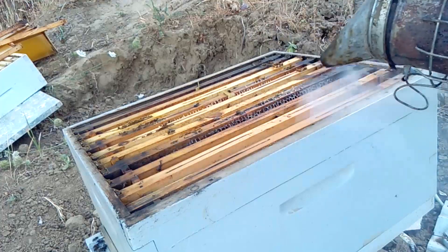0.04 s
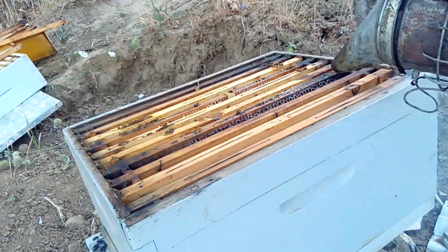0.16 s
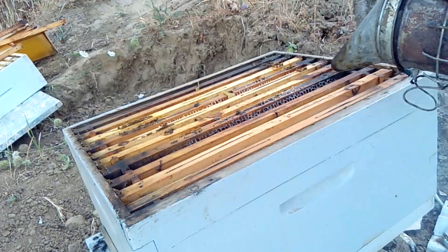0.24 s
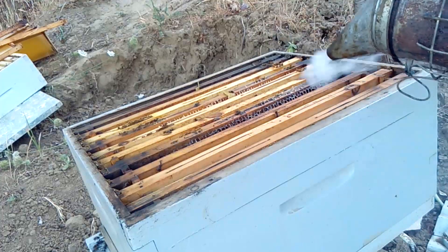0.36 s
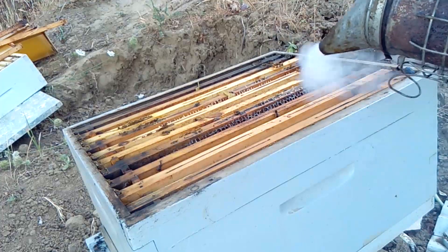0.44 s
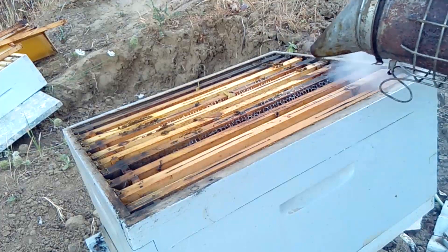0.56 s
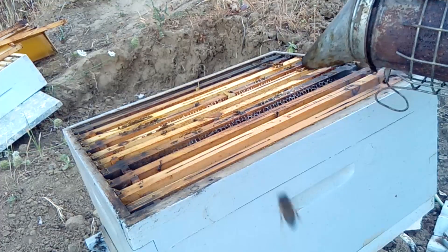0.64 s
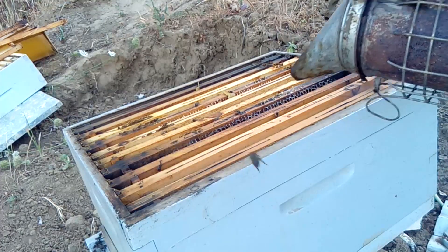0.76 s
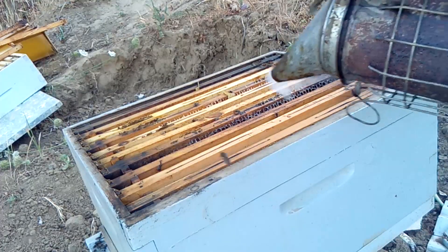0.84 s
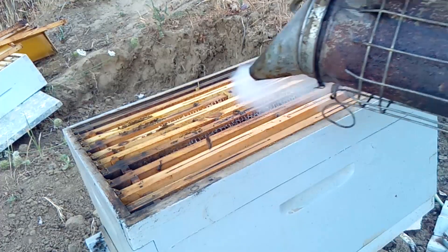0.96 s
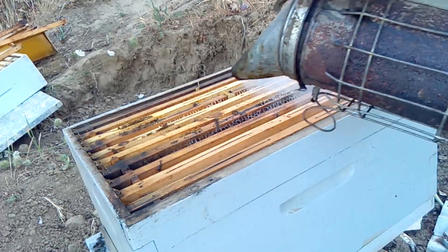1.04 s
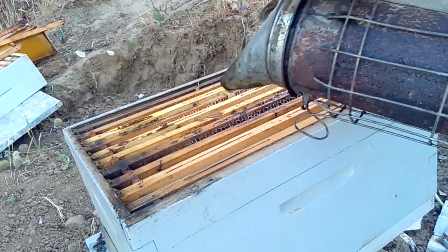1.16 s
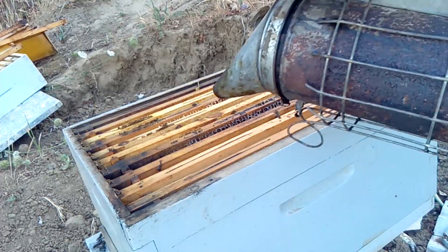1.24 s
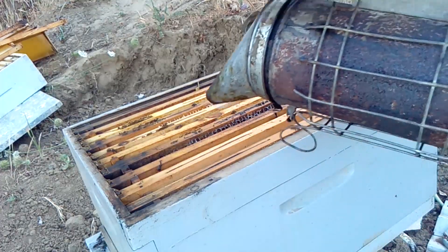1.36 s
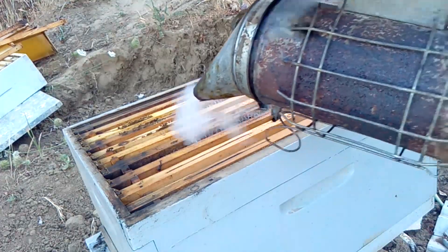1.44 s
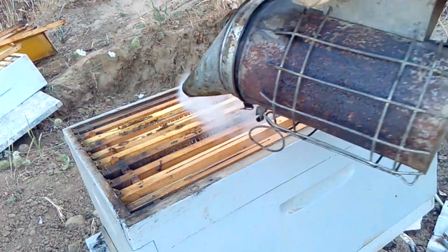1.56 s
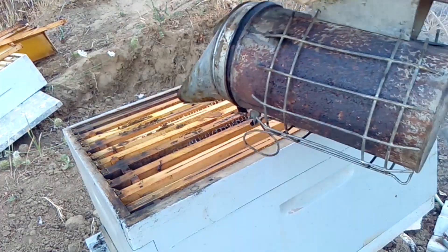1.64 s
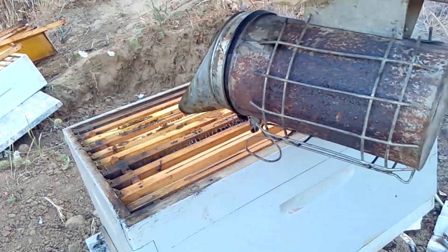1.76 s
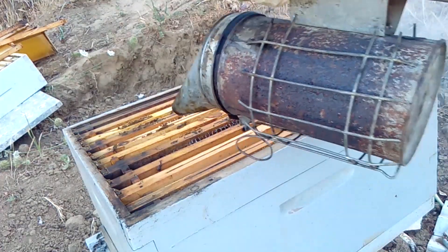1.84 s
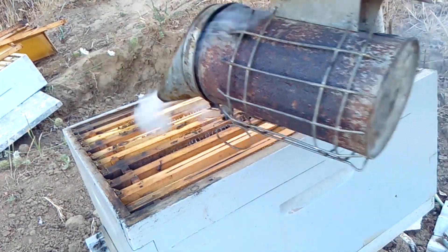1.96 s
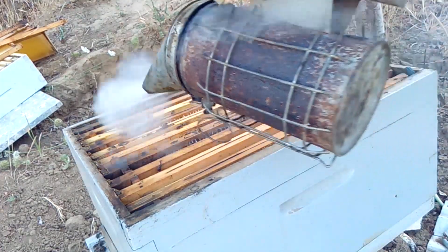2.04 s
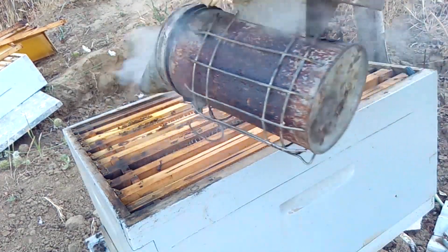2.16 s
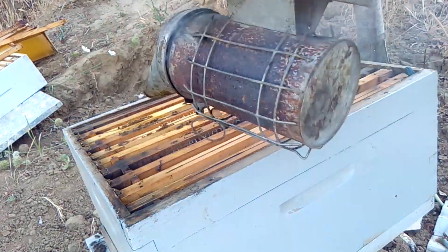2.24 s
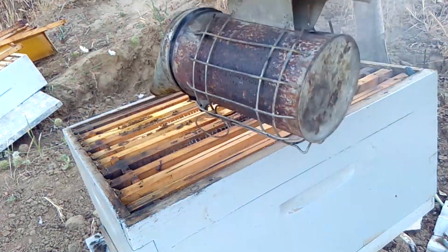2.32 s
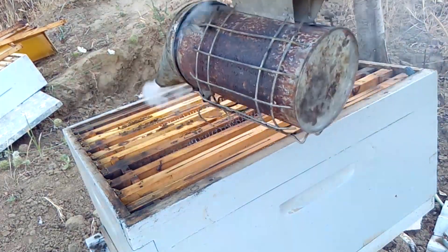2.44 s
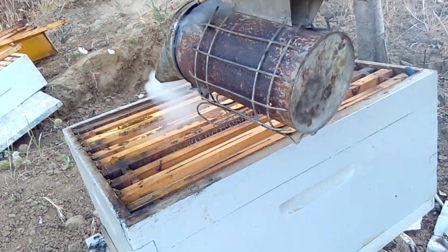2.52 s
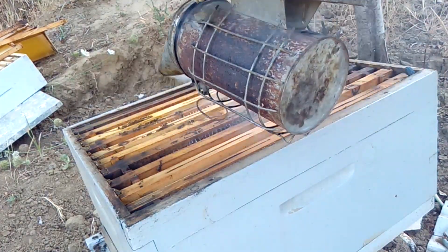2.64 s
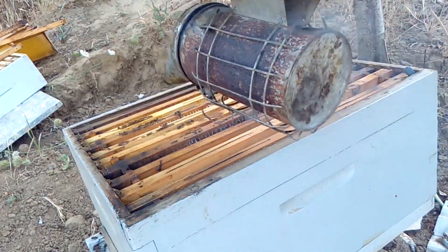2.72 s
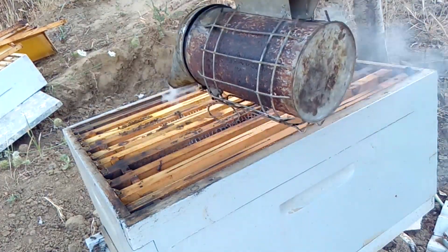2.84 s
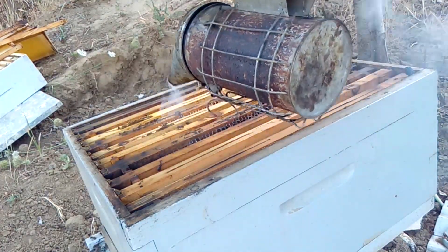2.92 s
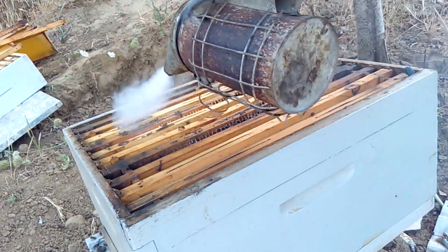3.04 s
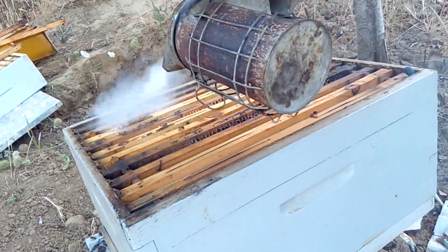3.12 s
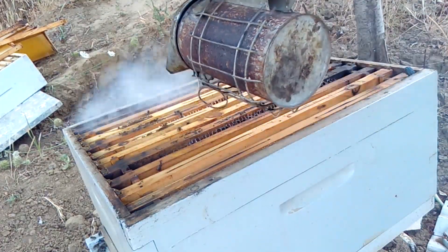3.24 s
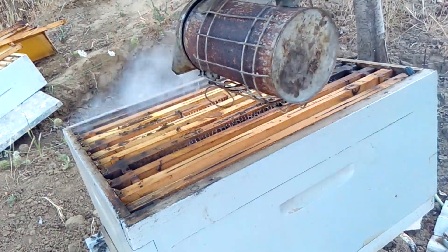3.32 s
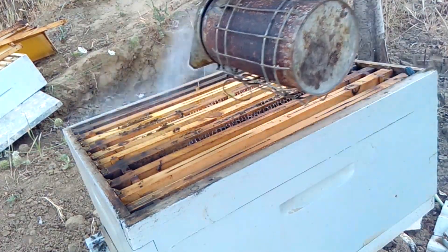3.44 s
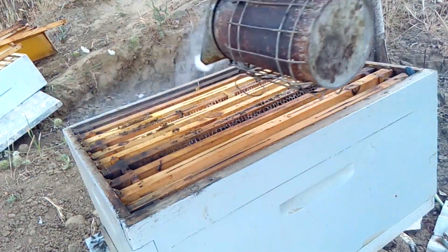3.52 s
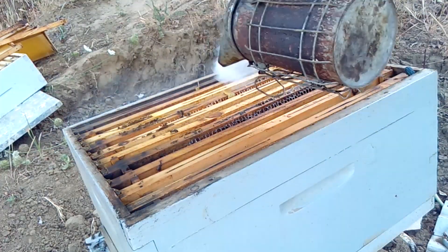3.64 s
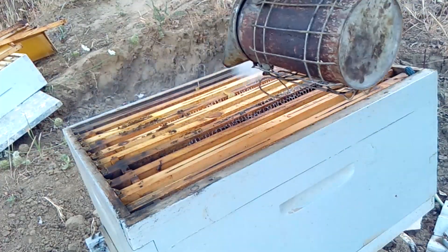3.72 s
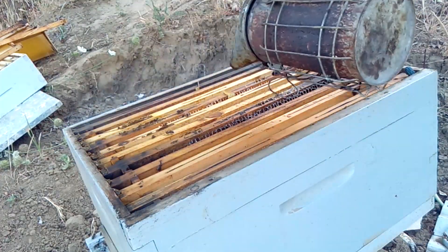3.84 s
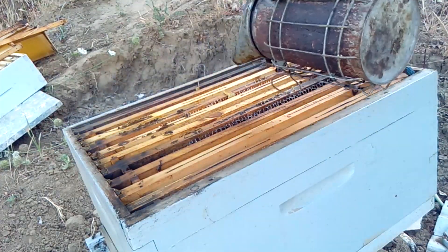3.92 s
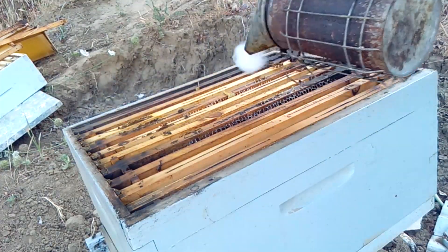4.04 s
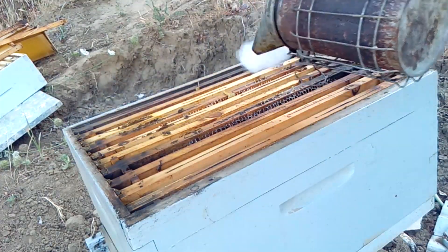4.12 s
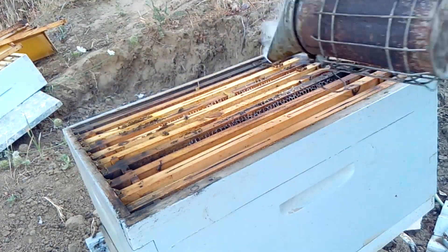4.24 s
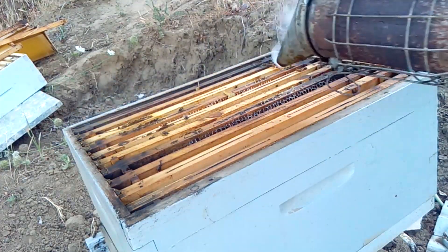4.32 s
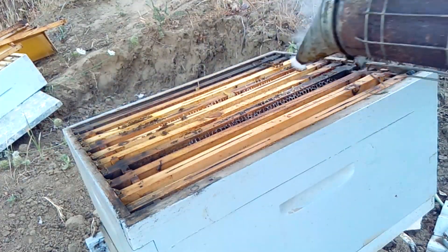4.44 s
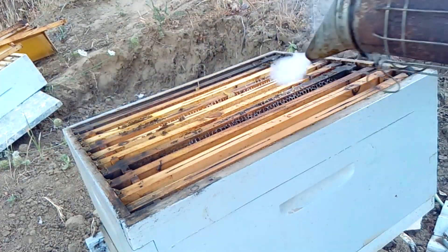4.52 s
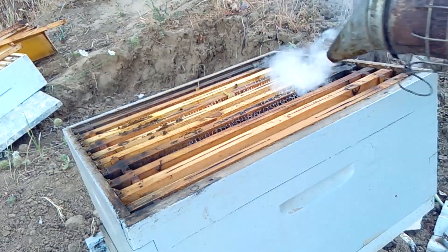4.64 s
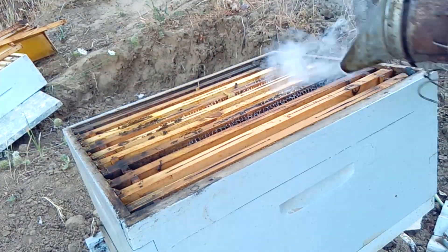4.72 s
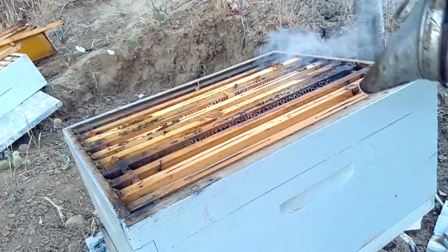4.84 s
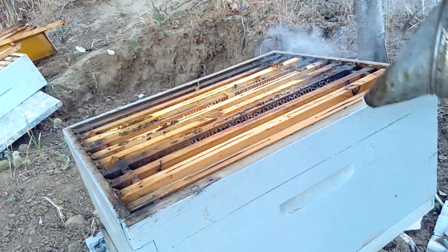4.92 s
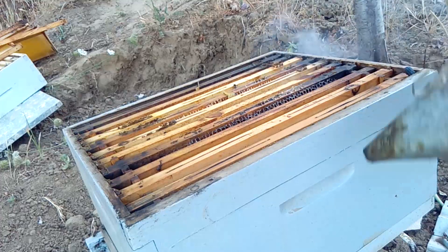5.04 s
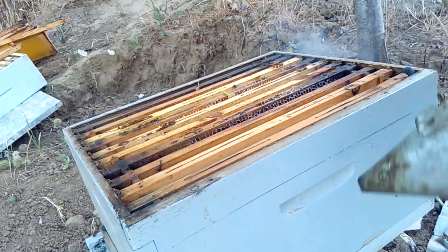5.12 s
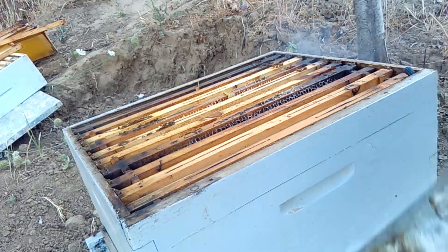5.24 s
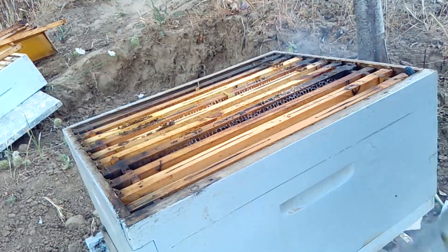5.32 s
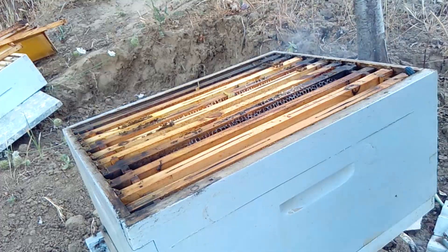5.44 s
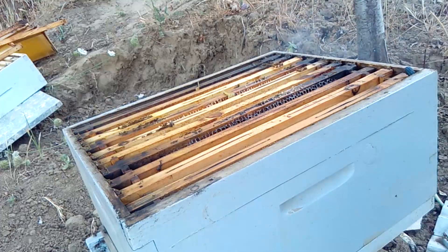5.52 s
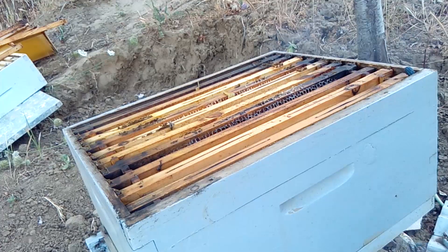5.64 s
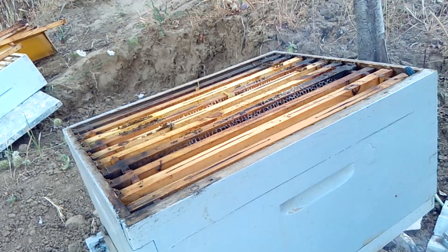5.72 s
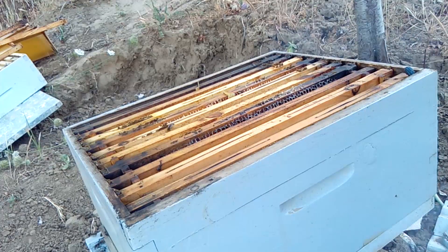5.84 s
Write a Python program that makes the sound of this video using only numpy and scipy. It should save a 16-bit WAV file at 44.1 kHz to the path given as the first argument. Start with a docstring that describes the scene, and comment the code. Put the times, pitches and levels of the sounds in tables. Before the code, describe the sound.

A hand squeezes a bee smoker beside an open hive: a dull bump, a rounded rush of air with soft hiss, a quick blurting flap as the bellows reopen, repeated nine times at an even pace. It stops with one bright tinny tick and grainy handling rubs. Faint bees pass and a far bird chirps downward. Close microphone, mono, very little echo.

```python
"""A bee smoker is pumped nine times over an open hive, outdoors, in quiet air with a few faint bees.
Each squeeze bumps the boards and drives a jet of air through the tin can and its nozzle: shaped noise.
Then the bellows suck air in, a crease pops, and the stiff skin flaps taut: a fluttering tone and tin rattle.
A far bird whistles falling notes late in the pumping and again at the end.
Last, wire clicks on the ringing tin, the smoker is carried off with a rustle, and bees fly by."""
import sys
import numpy as np
from scipy import signal
from scipy.fft import rfft, irfft, next_fast_len
from scipy.io import wavfile
from scipy.ndimage import map_coordinates

SR = 44100
rng = np.random.default_rng(int(sys.argv[2]) if len(sys.argv) > 2 else 0)


def to_wav(s):
    """Save 16-bit WAV."""
    ch = np.atleast_2d(s).T  # columns
    pcm = np.round(np.clip(ch, -1, 1) * 32767)  # PCM
    wavfile.write(sys.argv[1], SR, pcm.astype(np.int16))


N = 258861

# squeezes of the bellows: (full flow [s], rise [s], jet [dB], hollow tone re jet [dB], hiss re jet [dB])
SQUEEZES = [(.159, 0.068, -27, -4.5, -8), (.698, 0.074, -27, -6.5, -7.5), (1.214, 0.074, -25, -7, -9),
            (1.761, .081, -27.5, -5.5, -6.5), (2.267, 0.067, -28.5, -5.5, -6.5),
            (2.817, .086, -30, -4.5, -6.5), (3.354, 0.094, -32, -4.5, -9),
            (3.84, 0.086, -28.5, -6.5, -10.5), (4.31, 0.082, -29, -1.5, -9.5)]
# the skin flaps taut: (time [s], level [dB], pitch [Hz], rattle re flap [dB], intake hiss [dB], crease [dB])
FLAPS = [(0.3691, -24.5, 671, -13.5, -51.5, -35), (0.9037, -22, 558, -13.5, -49, -28.5),
         (1.4293, -21.5, 550, -20, -50, -43), (1.959, -23, 577, -15.5, -51.5, -41),
         (2.4753, -23, 598, -22, -54.5, -46), (3.0199, -23.5, 657, -26, -57, -46),
         (3.5398, -24, 655, -22, -59.5, -55), (4.0278, -24, 658, -15.5, -56, -47),
         (4.4957, -23.5, 582, -16, -50, -36.5)]
# colour of the bellows skin: (frequency [Hz], relative density [dB per Hz])
SKIN = [(60, -26), (150, -7), (340, 1), (430, -6.5), (700, 4), (950, -5.5), (1400, -10), (1800, -12.5),
        (2600, -25), (6000, -43), (10000, -58)]
# modes of the tin can: (frequency [Hz], relative level [dB], decay t60 [s])
TIN = [(577, 0.5, 0.036), (1333, -1, 0.035), (1490, 6.5, 0.022), (2160, -5, 0.018), (2480, -3, 0.025),
       (2770, -21, 0.021), (3185, 3, 0.018), (4020, -26, 0.023), (4920, 0.5, 0.017), (5360, 5, 0.027),
       (6030, 0.5, .02), (7260, -2, .018), (8700, -16, .02)]


def amp(db):
    """Decibels to gain."""
    return 10 ** (np.asarray(db) / 20)


def unit(x):
    """Scale to rms 1."""
    return x / np.sqrt(np.mean(x ** 2) + 1e-20)


def clock(n):
    """Seconds for n samples."""
    return np.arange(n) / SR


def value_at(s, rows):
    """Read (time, value) rows at time s, joined by straight lines."""
    return np.interp(s, *np.transpose(rows))


def wobble(rate, n):
    """A smooth random curve, rate knots a second."""
    knots = rng.standard_normal(int(n * rate / SR) + 4)
    return map_coordinates(knots, [clock(n) * rate])


def noise(spectrum, n, response=lambda hz: 1):
    """Noise of rms 1 with a (Hz, dB) spectrum and a further response."""
    hz = np.fft.rfftfreq(n, 1 / SR)
    f, db = np.transpose(spectrum)
    gain = amp(np.interp(np.log(hz + 1), np.log(f), db))
    return unit(irfft(rfft(rng.standard_normal(n)) * gain * response(hz), n))


def fade(t, t60):
    """Decay by 60 dB in t60 seconds, from t = 0 on."""
    return np.exp(-np.log(1000) * np.maximum(t, 0) / t60)


def add(track, s, x):
    """Mix x into the track at time s."""
    i = round(s * SR)
    x, i = x[max(-i, 0):], max(i, 0)
    track[i:i + len(x)] += x[:max(N - i, 0)]


def tin_colour(hz, boost=0.26, width_hz=55):
    """Air passing through the can is lifted at each mode of the tin but the lowest."""
    return 1 + boost * sum(1 / (1 + ((hz - mode) / width_hz) ** 2) for mode, _, _ in TIN[1:])


def scatter(strength, spread_s=.008, count=12):
    """The response of a few weak reflections off frames and boards, new for each pose of the smoker."""
    delays = rng.uniform(0.00198, spread_s, count)
    signs = rng.choice([-1, 1], count)

    def response(hz):
        """Narrow boards reflect the treble best."""
        treble = 2 * hz / (hz + 2500)
        return 1 + strength * treble * (signs @ np.exp(-2j * np.pi * np.outer(delays, hz)))
    return response


def puffs(can_echo=0.15, can_s=.0029, hive_echo=0.15, stray=0.048, flutter_db=1.04, fizz_db=-16):
    """The jet swells and dies with the squeeze: the can booms even at low flow, the hiss needs full flow."""
    # the jet's main roar: (frequency [Hz], relative density [dB per Hz])
    jet_colour = [(60, -27), (140, -23.5), (260, -12), (400, -3), (520, -8.5), (700, 3.5), (870, -1.5),
                  (1030, 2.5), (1350, -7.5), (1850, -14), (2700, -22.5), (3500, -23), (8000, -61)]
    # hiss of the nozzle: (frequency [Hz], relative density [dB per Hz])
    hiss_colour = [(600, -29), (1600, 1), (2750, 4.5), (3600, -7), (4100, -3), (4700, -5), (5800, -4.5),
                   (6900, -4.5), (8000, -17), (10000, -30), (12000, -45), (15000, -47)]
    # finest eddies: (frequency [Hz], relative density [dB per Hz])
    fizz_colour = [(3000, -25), (6900, 4.5), (7600, -6.5), (8300, -9), (10000, -10.5), (11500, -23.5),
                   (15000, -34)]
    # air booming in the can: (frequency [Hz], relative density [dB per Hz])
    hollow_colour = [(25, -32), (42, -43), (110, -24), (180, -16), (228, -6.5), (260, 0.5), (325, -4),
                     (400, -7.5), (520, -20), (1500, -71)]
    # the nozzle turns away: (time [s], treble tilt at 10 kHz [dB])
    aim = [(0, -1.5), (1.2, 2), (1.8, -3), (2.3, -6), (3.3, -1), (4.3, -3)]
    # the nozzle moves over the frames: (time [s], echo delay [s])
    hive_delay = [(.16, 0.00066), (.7, 0.00068), (1.2, 0.000847), (1.76, 0.0008), (2.27, 0.00072),
                  (2.82, 0.00112), (3.35, 0.000277), (4.31, 0.000716)]
    stroke_s = 0.17  # rise plus fall of the flow: a slow start leaves a quick finish
    rise_shape, fall_shape = 2.57, 2.23  # exponents of the flow curve
    # dB of each layer per dB of flow
    hollow_grip, hollow_release, hiss_grip, fizz_grip = 0.53, 0.57, 1.32, 2.2
    lead = 1.24  # the hollow tone starts this many rise times before full flow

    out, n = np.zeros(N), SR // 2
    t, hz = clock(n) - n / SR / 2, np.fft.rfftfreq(n, 1 / SR)
    delay = lambda s: np.exp(-2j * np.pi * hz * s)
    # sound runs to and fro in the can
    can = tin_colour(hz) / (1 - can_echo * delay(can_s))
    for s, rise, db, hollow_db, hiss_db in SQUEEZES:
        rising, falling = np.abs(t / rise) ** rise_shape, np.abs(t / (stroke_s - rise)) ** fall_shape
        flow_db = -20 * np.where(t < 0, rising, falling)
        eddies_db = flutter_db * wobble(170.2, n)
        # it comes back off the hive
        hive = (1 + hive_echo * delay(value_at(s, hive_delay))) * scatter(stray)(hz)
        path = can * hive
        # the treble beams along the nozzle
        aim_db = value_at(s, aim)
        beam = amp(aim_db * hz / 10 ** 4)

        jet = amp(flow_db + eddies_db) * noise(jet_colour, n, lambda _: path)
        # the hollow tone only begins once the hand has started to press
        pressed = (1 + np.tanh((t + lead * rise) / 0.0069)) / 2
        boom_db = hollow_db + np.where(t < 0, hollow_grip, hollow_release) * flow_db
        hollow = pressed * amp(boom_db) * noise(hollow_colour, n)
        hiss_level = amp(hiss_db + hiss_grip * flow_db + eddies_db)
        hiss = hiss_level * noise(hiss_colour, n, lambda _: path * beam)
        fizz_level = amp(hiss_db + fizz_db + aim_db + fizz_grip * flow_db + eddies_db)
        fizz = fizz_level * noise(fizz_colour, n, lambda _: path)
        add(out, s + t[0], amp(db) * (jet + hollow + hiss + fizz))
    return out


def flaps(start=0.58, slack=.53, attack_s=0.00085, crumple=0.28, stop_t60=0.035):
    """The skin unfolds, flutters ever harder until taut, swings out lower and rattles the can, which rings on."""
    taut_cycles = 6.8  # swings of the skin until it is taut
    tail_db, tail_t60 = -16, 0.18
    rattle_hz, rattle_width_hz = 1370, 260
    ring_db, ring_width_hz, ring_t60 = -9, 55, 0.18  # ring level re rattle
    unfold_s, unfold_db = 0.0088, -7  # lead before the flap, level re rattle

    out, n = np.zeros(N), SR // 4
    t = clock(n)
    tin = lambda width: noise(SKIN, n, lambda f: 1 / (1 + ((f - rattle_hz) / width) ** 4))
    for s, db, hz, rattle_db, _, _ in FLAPS:
        taut = taut_cycles / hz
        swell = (start + (1 - start) * np.minimum(t / taut, 1)) * (1 - np.exp(-t / attack_s))
        # the pitch drops to the slack fraction once the skin is taut
        dropped = (1 + np.tanh((t - taut - .001) / 0.00091)) / 2
        pitch = hz * (1 - (1 - slack) * dropped) * (1 + 0.1 * wobble(371, n))
        swing = np.sin(2 * np.pi * np.cumsum(pitch) / SR)
        stop = fade(t - taut, stop_t60)
        blow = stop * (0.68 * swing + crumple * noise(SKIN, n))
        tail = amp(tail_db) * fade(t - taut, tail_t60) * (0.23 * swing + 0.5 * noise(SKIN, n))
        ring = amp(ring_db) * fade(t - taut, ring_t60) * tin(ring_width_hz)
        rattle = amp(rattle_db) * (stop * tin(rattle_width_hz) + ring)
        add(out, s, amp(db) * swell * (blow + tail + rattle))

        unfolding = np.minimum(2 * t / unfold_s, 1) * fade(t - unfold_s, stop_t60)
        add(out, s - unfold_s, amp(db + rattle_db + unfold_db) * unfolding * noise(SKIN, n))
    return out


def intake(before_s=0.067, after_s=0.077, stray=0.2, whistle_db=-10.0):
    """Air is sucked in while the bellows open; the valve whistles thinly, even in a weak draught."""
    # the draught: (frequency [Hz], relative density [dB per Hz])
    draught_colour = [(60, 1.5), (250, 10), (650, 10.5), (1000, 2.5), (1400, 6), (2200, -0.5), (3300, -5.5),
                      (5000, -12), (6500, -4), (8000, -14.5), (11000, -40), (15000, -41)]
    # air whistling past the valve: (frequency [Hz], half width [Hz], relative level [dB])
    valve_tones = [(4890, 110, 2), (5620, 150, -0.5), (6340, 150, -3.5)]
    out, n = np.zeros(N), SR // 2
    t = clock(n) - n / SR / 2
    for s, _, _, _, db, _ in FLAPS:
        suction = np.exp(-(t / np.where(t < 0, before_s, after_s)) ** 2)
        opening = 1 + 0.063 * rng.standard_normal()  # shifts all whistle pitches together

        def valve(f):
            """Resonant peaks of the valve gap."""
            return sum(amp(level) / (1 + ((f - hz * opening) / width) ** 2)
                       for hz, width, level in valve_tones)
        draught = suction * noise(draught_colour, n, scatter(stray))
        whistle = amp(whistle_db) * suction ** 0.51 * noise(draught_colour, n, valve)
        add(out, s + t[0], amp(db) * (draught + whistle))
    return out


def knocks(cycles=9, hang_s=0.014, grit=0.22):
    """Dull, damped bumps of squeezes, creases and stray hand moves: the lower, the softer and longer."""
    # stray bumps of the hand on the boards: (time [s], level [dB], pitch [Hz])
    stray_bumps = [(0.118, -18.5, 470), (4.584, -39, 650), (5.015, -45, 606), (5.046, -44, 102),
                   (5.182, -42, 142)]
    # the boards bump as the hand bears down, this many rise times before full flow
    grip_lead, grip_db, grip_hz = 1.08, -36, 486
    # a crease pops before each flap, higher when harder
    crease_lead_s, crease_hz, crease_ref_db, crease_db_per_octave = .054, 302, -37.5, 9

    out, t = np.zeros(N), clock(SR // 8)
    grips = [(s - grip_lead * rise, grip_db, grip_hz * 2 ** rng.normal(0, 0.11))
             for s, rise, *_ in SQUEEZES]
    creases = [(s - crease_lead_s, db, crease_hz * 2 ** ((db - crease_ref_db) / crease_db_per_octave))
               for s, *_, db in FLAPS]
    for s, db, hz in grips + creases + stray_bumps:
        body = np.sin(2 * np.pi * hz * t) + grit * noise(SKIN, len(t))
        envelope = fade(t, hang_s + cycles / hz) * (1 - np.exp(-2 * hz * t))
        add(out, s, amp(db) * body * envelope)
    return out


def clicks(ring_db=-11, crack_db=-5, rattle_db=-22, rattle_t60=0.059):
    """The wire guard ticks against the can, rings its modes and rattles briefly."""
    # wire on tin: (time [s], level [dB])
    ticks = [(4.5835, -42), (4.7193, -24), (4.7207, -38.5), (4.7222, -36), (4.7526, -42)]
    crack_colour = [(150, -15), (500, 6.5), (6500, -2), (8500, -11), (15000, -28)]  # (Hz, dB per Hz)
    out, t = np.zeros(N), clock(SR // 8)
    for s, db in ticks:
        ring = 0
        for hz, level, t60 in TIN:
            mode = np.sin(2 * np.pi * (hz * t + rng.random()))
            ring = ring + amp(level + rng.normal(0, 1.5)) * fade(t, t60) * mode
        contact = amp(crack_db) * fade(t, 0.0065) + amp(rattle_db) * fade(t, rattle_t60)
        crack = contact * noise(crack_colour, len(t))
        add(out, s, amp(db) * (amp(ring_db) * ring + crack) * (1 - np.exp(-t / 0.00047)))
    return out


def rustle(grain_db=3.0, scuff_t60=0.22):
    """Grainy rubs swell and die as the smoker is carried away, with a dry scuff after the last one peaks."""
    # rubs: (peak [s], level [dB], attack [s], decay t60 [s])
    rubs = [(4.605, -49.5, 0.037, 0.3), (4.745, -50, 0.053, 0.27), (5.021, -46, 0.022, 0.4),
            (5.125, -53.5, 0.075, 0.66)]
    # short dry scrape: (time [s], level [dB])
    scuffs = [(5.229, -53.5)]
    # rubbing: (frequency [Hz], relative density [dB per Hz])
    rub_colour = [(50, -30.5), (110, 3), (250, 6), (400, 4), (600, 5), (900, 2), (1500, 8), (2500, 0),
                  (4000, -0.5), (6500, 4.5), (9000, -16), (12000, -39), (15000, -39)]
    scuff_colour = [(2500, -29), (3300, 1), (4000, 5), (4800, -14), (9000, -33)]  # (Hz, dB per Hz)
    now, t = clock(N), clock(SR // 4)
    rubbing = 0
    for s, db, attack, t60 in rubs:
        swell = np.exp(-(np.minimum(now - s, 0) / attack) ** 2)
        rubbing = rubbing + amp(db) * swell * fade(now - s, t60)
    out = rubbing * unit(amp(grain_db * wobble(350, N)) * noise(rub_colour, N))
    for s, db in scuffs:
        add(out, s, amp(db) * fade(t, scuff_t60) * noise(scuff_colour, len(t)))
    return out


def yard(x, wet_db=-27, t60=0.29):
    """The earth bank and the hives return a faint, short echo: a decaying noise tail."""
    t = clock(SR // 3)
    tail = rng.standard_normal(len(t)) * fade(t, t60) * (1 - np.exp(-t / 0.007))
    return x + amp(wet_db) * signal.fftconvolve(x, tail / np.linalg.norm(tail))[:N]


def bees(wing_hz=239, waver=.05, overtone_db=-11, uneven_db=3.5, count=4):
    """A few bees, each with a wandering wingbeat and overtones; the hum swells as one flies past."""
    # a bee flies close by: (nearest [s], level [dB])
    flybys = [(4.77, -68.5), (5.12, -56.5), (5.45, -69.5), (5.71, -60.5)]
    pass_s = 0.03  # time a bee takes to fly its own distance from the listener
    hum = 0
    for _ in range(count):
        phase = 2 * np.pi * np.cumsum(wing_hz * (1 + waver * wobble(6.3, N))) / SR
        buzz = sum(amp(overtone_db * k) * np.sin((k + 1) * phase) for k in range(4))
        hum = hum + amp(uneven_db * wobble(5.15, N)) * buzz
    # power falls with the square of the distance
    power = sum(amp(db) ** 2 / (1 + ((clock(N) - s) / pass_s) ** 2) for s, db in flybys)
    return np.sqrt(power) * unit(hum)


def bird(high_hz=5550, low_hz=3700, length_s=.052, wet=1.0, blur=0.018):
    """Far whistles that slide down, smeared by the surroundings."""
    # falling bird notes: (time [s], level [dB])
    notes = [(3.655, -62.5), (3.894, -54), (5.566, -64), (5.815, -58.5)]
    out, t = np.zeros(N), clock(SR // 8)
    u = np.minimum(t / length_s, 1)
    for s, db in notes:
        slide = high_hz + (low_hz - high_hz) * np.sin(np.pi / 2 * u)
        pitch = slide * (1 + blur * wobble(830, len(t)))
        add(out, s, amp(db) * np.sin(np.pi * u) * np.sin(2 * np.pi * np.cumsum(pitch) / SR))
    tail = rng.standard_normal(len(t)) * fade(t, 0.37)
    return out + wet * signal.fftconvolve(out, tail / np.linalg.norm(tail))[:N]


def open_air():
    """Quiet outdoor air: steady shaped noise whose level drifts slowly."""
    # background: (frequency [Hz], relative density [dB per Hz])
    air_colour = [(25, -31), (70, -8), (160, -5), (310, -5.5), (550, -9.5), (950, -9.5), (1500, -14),
                  (3000, -17.5), (5000, -17), (6000, -15), (7000, -16), (8200, -29.5), (11000, -35.5),
                  (15300, -38)]
    return amp(-61.5 + wobble(4.29, N)) * noise(air_colour, N)


def scene():
    """The smoker close by, over quiet open air."""
    smoker = puffs() + flaps() + intake() + knocks() + clicks() + rustle()
    return (yard(smoker) + bees() + bird() + open_air())[None]


def record(dry, top_hz=15450):
    """A sharp band limit: nothing is kept from top_hz up."""
    m = next_fast_len(N + SR // 2)
    kept = np.fft.rfftfreq(m, 1 / SR) < top_hz
    return irfft(rfft(dry, m) * kept, m)[..., :N]


dry = scene()
out = record(dry)
to_wav(out)
```